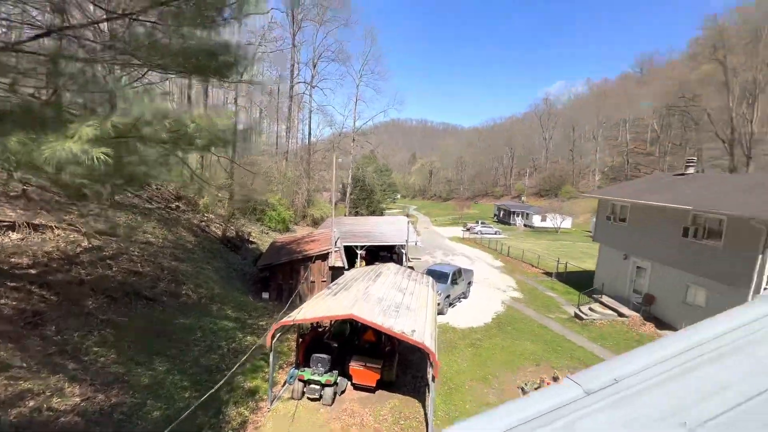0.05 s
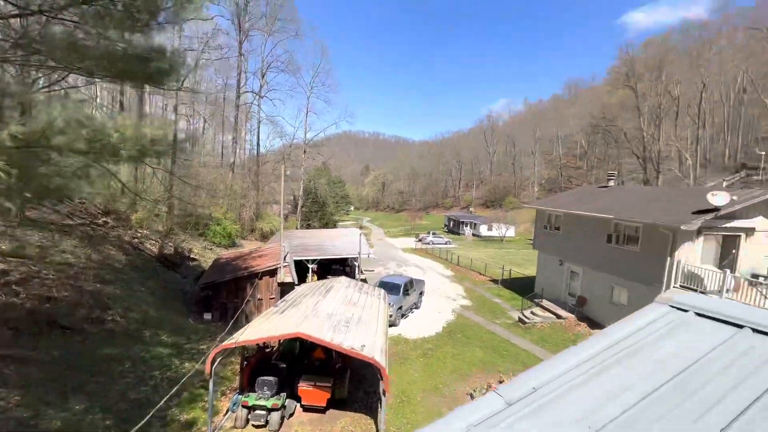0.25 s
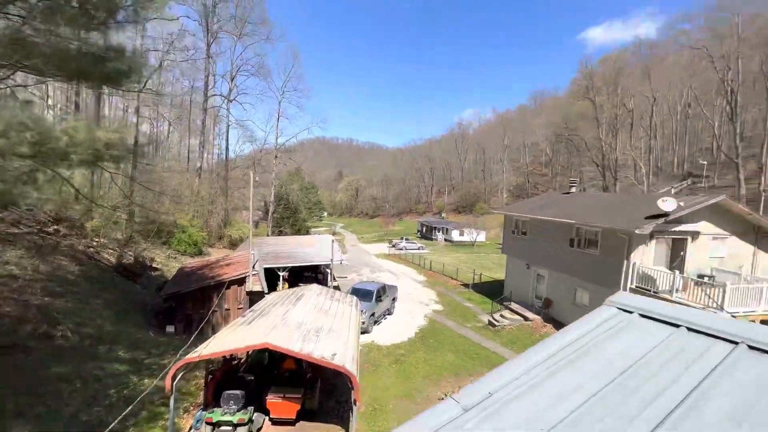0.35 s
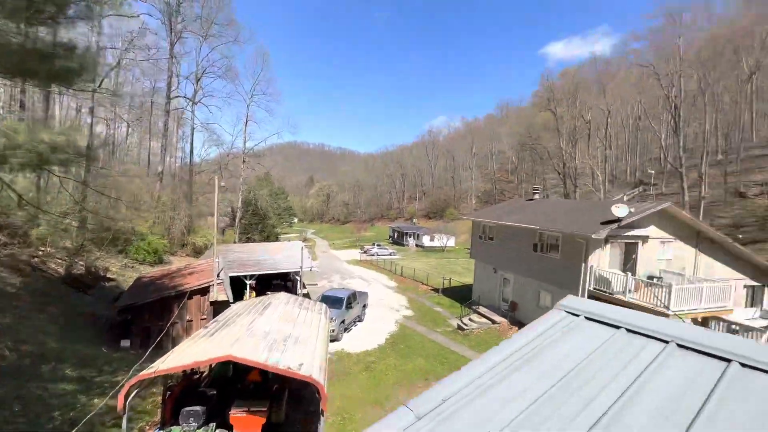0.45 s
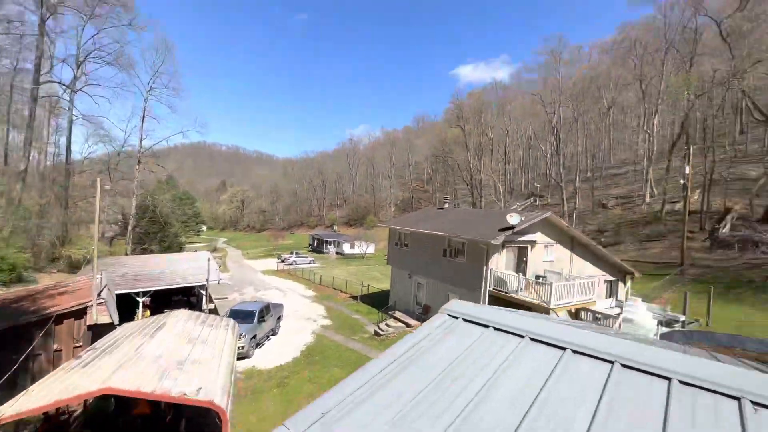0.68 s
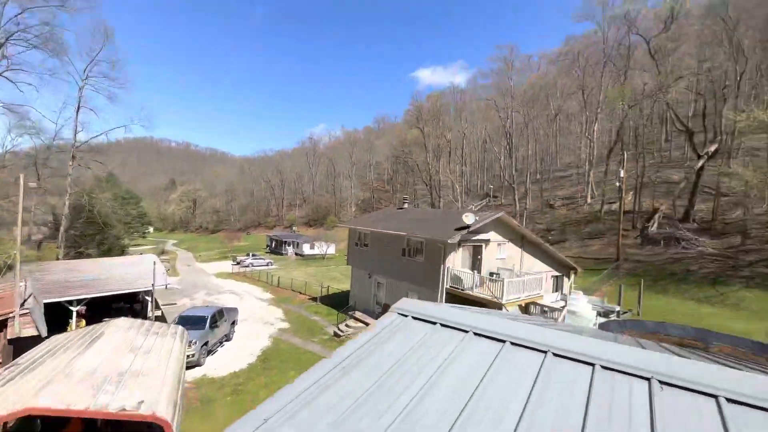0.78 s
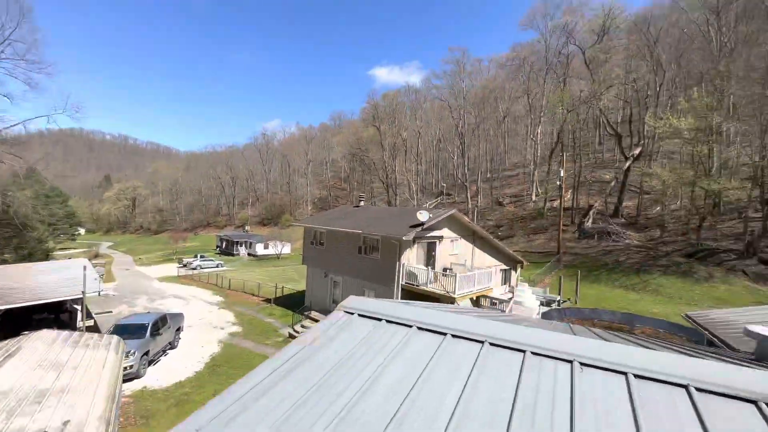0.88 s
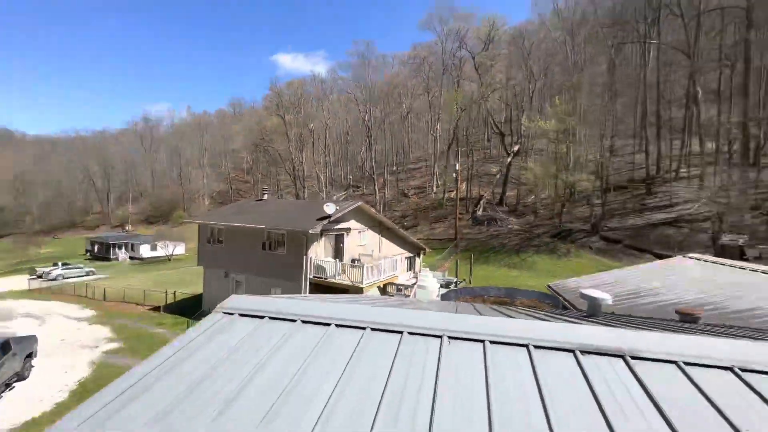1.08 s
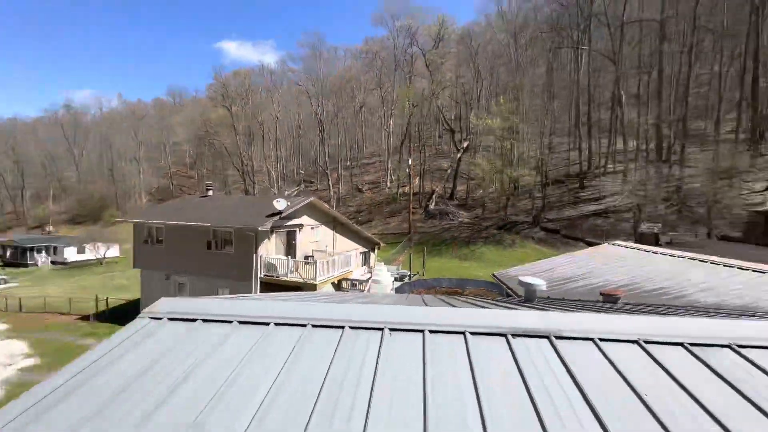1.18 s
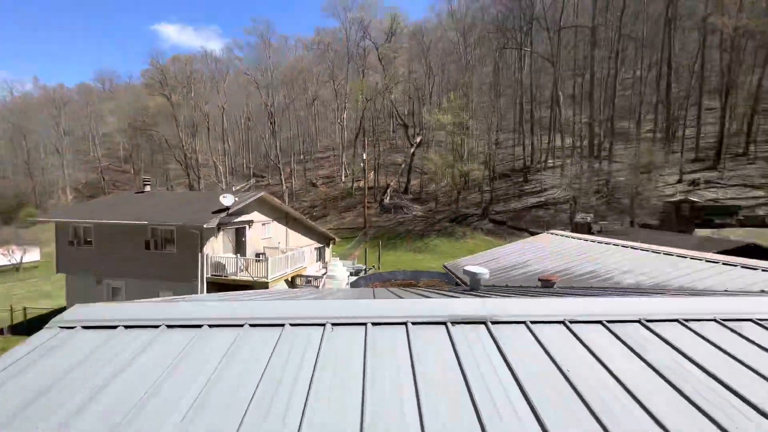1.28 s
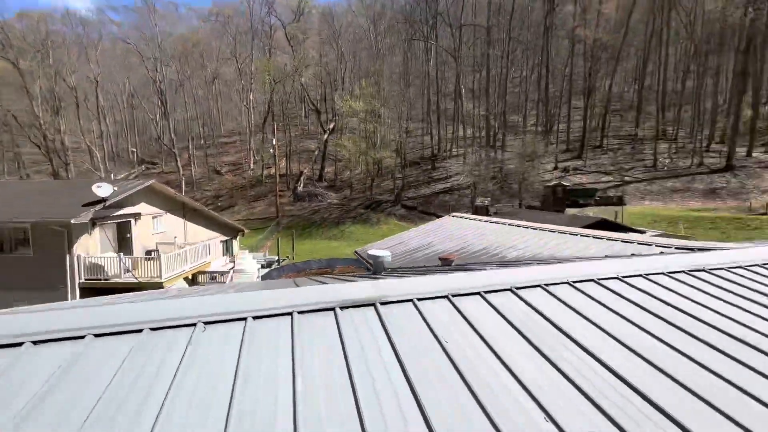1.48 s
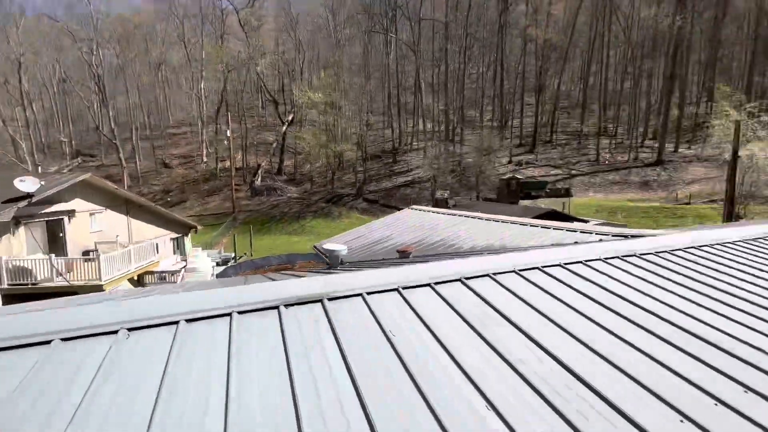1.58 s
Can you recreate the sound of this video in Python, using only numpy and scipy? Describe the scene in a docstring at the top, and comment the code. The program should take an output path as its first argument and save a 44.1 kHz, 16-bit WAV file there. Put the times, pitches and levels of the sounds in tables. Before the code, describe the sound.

Close footsteps sound on a ribbed metal roof. At about 0.25 seconds a step knocks hollowly, and the sheet snaps back with a sharp clack just after 0.3. Soles scuff and tap lightly, with tiny grit clicks, until about 0.8. A second, duller step thumps at 1.35 seconds, followed by a softer bump and a scuff. Faint wind and a distant engine drone continue throughout.

```python
"""Light wind and a far engine's drone fill a quiet valley, and close to a stereo pair of microphones
someone shifts their footing on a ribbed metal roof. A first step knocks on the sheet, which flexes,
rings hollow and snaps back with a sharp clack. Soles scuff and tap, grit clicks, then a second,
duller step thumps. The blows travel through the metal as bending waves, treble ahead of bass."""
import sys
import numpy as np
from scipy import signal
from scipy.fft import rfft, irfft
from scipy.io import wavfile

SR = 44100
rng = np.random.default_rng(int(sys.argv[2]) if len(sys.argv) > 2 else 0)


def output_pcm(signal):
    """Save a mono or channel-first signal as 16-bit PCM at the path in sys.argv[1].

    Samples are clipped to [-1, 1] before scaling.
    """
    pcm = np.clip(np.atleast_2d(signal).T, -1, 1) * 32767
    wavfile.write(sys.argv[1], SR, np.round(pcm).astype(np.int16))


N = 72765
TIME, FREQS = np.arange(N) / SR, np.fft.rfftfreq(N, 1 / SR)
BEND_DELAY_S = 0.001733  # travel time of a 1 kHz bending wave from foot to microphone

# The sheet under a foot. Each row: mode in Hz, level in dB, seconds to fall 60 dB.
PANEL_MODES = [(183.5, -26.5, 0.4), (313, -11.5, 0.014), (450, -1, 0.015), (636, -7.5, 0.014),
               (789, -27, 0.08), (923, -24, 0.073), (1150, -26, 0.03), (1364, -3.5, 0.0068)]
# Rubber sole on painted metal. Each row: frequency in Hz, relative spectral level in dB.
SOLE_SPECTRUM = [(100, 4.5), (300, 0.5), (520, 5), (950, 1.5), (1500, -4.5), (2500, -5.5), (5000, -14),
                 (9000, -18.5), (12000, -31), (16000, -52)]
# Fine hiss of air and cloth. Each row: frequency in Hz, relative spectral level in dB.
HISS_SPECTRUM = [(100, 20.5), (1000, -7), (3000, -2), (6000, -1.5), (9300, -6), (11500, -18.5),
                 (16000, -34)]


def from_db(db):
    """Decibels to gain."""
    return 10 ** (np.asarray(db) / 20)


def rms_one(x):
    """Scale to rms 1."""
    return x / np.sqrt(np.mean(x ** 2) + 1e-20)


def pan(db):
    """Stereo gains for a pan in dB, left minus right."""
    return from_db(np.array([[db], [-db]]) / 2)


def level_curve(rows):
    """Gain over time through points of seconds and dB."""
    return from_db(np.interp(TIME, *np.transpose(rows)))


def swells(rows):
    """Gain over time of bell-shaped bumps."""
    return sum(from_db(db) * np.exp(-.5 * ((TIME - s) / half_s) ** 2) for s, half_s, db in rows)


def across_freqs(points):
    """Spread a table over FREQS on a log-frequency axis."""
    hz, value = np.transpose(points)
    return np.interp(np.log(FREQS + 1e-9), np.log(hz), value)


def butter(x, hz, kind, order=2):
    """Causal low- or high-pass."""
    return signal.sosfilt(signal.butter(order, hz, kind, fs=SR, output="sos"), x + 1e-18)


def drift(rate_hz):
    """Random motion of rms 1, mostly slower than rate_hz."""
    return rms_one(irfft(rfft(rng.standard_normal(N)) / (1 + (FREQS / rate_hz) ** 2), N))


def noise(spectrum):
    """Coloured stereo noise of rms 1, alike in the bass and wide in the treble."""
    # Likeness at the two microphones. Each row: frequency in Hz, left-right correlation.
    correlation = [(60, 0.59), (200, 0.76), (500, 0.14), (1200, 0.12), (3000, 0.096), (9000, 0.052)]
    alike = across_freqs(correlation)
    mid, side = rfft(rng.standard_normal((2, N))) * from_db(across_freqs(spectrum)) * (FREQS > 20)
    return rms_one(irfft(np.sqrt(1 + alike) * mid + np.sqrt(1 - alike) * side * [[1], [-1]], N))


def decay(start, t60, attack=0.0018):
    """Quick rise, then a fall of 60 dB every t60 seconds."""
    age = np.maximum(TIME - start, 0)
    return (1 - np.exp(-age / attack)) * np.exp(-np.log(1000) * age / t60)


def strike(start, modes):
    """Damped modes set ringing at one moment."""
    age = np.maximum(TIME - start, 0)
    return sum(from_db(db) * np.sin(2 * np.pi * hz * age) * np.exp(-np.log(1000) * age / t60)
               for hz, db, t60 in modes)


def bend(x, delay_s):
    """Bending waves run faster at high pitch, so a blow arrives as a short falling chirp."""
    return irfft(rfft(x) * np.exp(-4j * np.pi * delay_s * np.sqrt(1000 * FREQS)), N)


def wind():
    """Wind eases off in the valley's trees, with a fine fluttering hiss above it."""
    # The low wash. Each row: frequency in Hz, relative spectral level in dB.
    wash_spectrum = [(25, -17), (50, 10.5), (120, -2.5), (230, -2), (550, 0.5), (950, -4.5), (1550, -6),
                     (2800, -12), (6000, -23), (14000, -39)]
    # Rise and fall of the wash and of the hiss. Each row: time in seconds, level in dB.
    wash_levels = [(0, -51), (.22, -53), (.42, -53), (.6, -54), (.85, -58.5), (1.15, -61), (1.26, -62.5),
                   (1.31, -60), (1.52, -58), (1.65, -68)]
    hiss_levels = [(0, -56.5), (.4, -63.5), (.72, -61), (.95, -62.5), (1.17, -63.5), (1.25, -61),
                   (1.31, -68.5), (1.4, -67.5), (1.5, -62), (1.65, -66)]
    flutter = from_db(2.34 * drift(rate_hz=14))
    hiss = level_curve(hiss_levels) * flutter * noise(HISS_SPECTRUM)
    wash = level_curve(wash_levels) * noise(wash_spectrum)
    return wash * pan(1.5) + hiss * pan(0.44)


def far_engine():
    """A distant engine's low tones waver and slowly fade while a higher whine comes and goes."""
    # The drone. Each row: frequency in Hz, level in dB halfway through the scene.
    drone_tones = [(55, -57), (97, -61.5), (135.5, -73), (194, -73.5), (388, -88)]
    # The whine. Each row: time in seconds, level in dB.
    whine_levels = [(0, -67.5), (.55, -60.5), (.8, -83), (.98, -72), (1.12, -66), (1.3, -69), (1.65, -72)]
    waver_db, fade_db_per_s, whine_hz = 0.25, 3.5, 293.7

    def tone(hz):
        return np.sqrt(2) * np.sin(2 * np.pi * hz * TIME + 0.52 * drift(rate_hz=3.5))
    drone = sum(from_db(db + waver_db * drift(rate_hz=7)) * tone(hz) for hz, db in drone_tones)
    fade = from_db(-fade_db_per_s * (TIME - TIME.mean()))
    whine = level_curve(whine_levels) * tone(whine_hz)
    return (drone * fade + whine) * pan(.9)


def sheet_ring():
    """Off to the left, the whole sheet murmurs under a sliding sole and sings after a hard blow."""
    # Its thin metallic ring. Each row: mode in Hz, level in dB.
    modes = [(428, -14.5), (628, -10), (749, -7.5), (1320, 0.5), (1460, -1.5), (1520, -3), (1640, 0),
             (1760, -6.5), (2250, -5.5), (2955, -7.5), (3491, -10.5)]
    # The sole sliding. Each row: time in seconds, level in dB.
    rub_levels = [(0, -53), (.2, -55.5), (.45, -60.5), (.65, -75), (.9, -76), (1.65, -69.5)]
    # Hard blows. Each row: start in seconds, level in dB.
    blows = [(0.272, -47.5), (.3245, -34.5)]
    width_hz, ring_t60 = 51, 0.097
    resonance = sum(from_db(db) / (1 + 2j * (FREQS - hz) / width_hz) for hz, db in modes)
    rubbed = level_curve(rub_levels) * rms_one(irfft(rfft(noise(SOLE_SPECTRUM)) * resonance, N))
    damped_modes = [(hz, db, ring_t60) for hz, db in modes]
    struck = sum(from_db(db) * strike(s, damped_modes) for s, db in blows)
    return (rubbed + struck) * pan(5.9)


def cloth():
    """Clothing rustles, soft and bright, with the movement."""
    # Each row: middle in seconds, half length in seconds, level in dB.
    rustles = [(.228, 0.014, -62), (.292, 0.0078, -52), (1.225, 0.04, -67.5), (1.615, 0.019, -60.5)]
    return swells(rustles) * rms_one(butter(noise(HISS_SPECTRUM), 3460, "high"))


def footfalls():
    """Rubber slaps the paint, the panel rings and the blow spreads through the roof, the bass longest."""
    # Contacts, dull when soft and thin when light. Each row: start in seconds, level in dB, low-pass
    # in Hz, high-pass in Hz, tail trim in dB, pan in dB, bearing to the right in degrees.
    contacts = [(0.2455, -25, 1940, 372, -3.5, -3.5, -11), (.2720, -14.5, 1600, 268, -7.5, 0, 19),
                (0.2811, -26.5, 1290, 200, 5.5, 5, 31), (0.4678, -29, 2600, 405, -9, 1, -11),
                (1.3418, -17.5, 730, 246, -3.5, -2.5, 34.5), (1.3512, -29, 504, 188, 5, 1, 14),
                (1.436, -32.5, 750, 240, 4.5, 2, 5), (1.4451, -30.5, 376, 160, -3.5, -1, -8),
                (1.475, -40, 870, 300, -9, 4, -7)]
    mic_gap_s = .00045  # travel time of sound between the microphones
    roof = 0
    for s, db, bright_hz, low_hz, tail_db, pan_db, bearing in contacts:
        left_lag, arrival = mic_gap_s * np.sin(np.radians(bearing)), s + BEND_DELAY_S
        panel = np.array([strike(s + left_lag, PANEL_MODES), strike(s, PANEL_MODES)])
        knock = bend(panel, BEND_DELAY_S) * pan(pan_db) + from_db(tail_db - 10) * roof_tail(arrival)
        body = butter(butter(knock, bright_hz, "low"), low_hz, "high")
        slap = from_db(-31.5) * butter(noise(SOLE_SPECTRUM), 1610, "high") * decay(arrival, t60=0.1)
        roof = roof + from_db(db) * (body + slap)
    return roof


def roof_tail(start):
    """A blow scatters through the roof as a short wash whose bass lingers."""
    # Each row: frequency in Hz, relative spectral level in dB.
    spectrum = [(50, 1), (170, 2), (280, 5.5), (450, 5), (750, 4), (1050, -4.5), (1450, 1.5), (2200, -5),
                (6000, -11.5), (14000, -23)]
    wash = noise(spectrum)
    return wash * decay(start, t60=0.13) + butter(wash, 277, "low") * decay(start, t60=0.23)


def deck_flex():
    """The roof deck gives under the weight and swings a few times."""
    # Each row: start in seconds, level in dB.
    loads = [(0.2553, -19.5), (0.322, -29), (1.441, -42)]
    swing_hz = 71
    return sum(from_db(db) * np.cos(2 * np.pi * swing_hz * (TIME - s)) * decay(s, 0.076, attack=0.0048)
               for s, db in loads)


def span_booms():
    """A hollow ring lingers in the span under the foot; a shorter span rings higher."""
    # Heavy blows. Each row: start in seconds, level in dB, pitch ratio, high-pass in Hz.
    blows = [(.276, -36, 0.99, 111), (1.349, -39, 1.18, 150), (1.443, -49, 1.27, 210)]
    # The span. Each row: mode in Hz at pitch ratio 1, level in dB, seconds to fall 60 dB.
    modes = [(125.5, -5, 0.2), (161.3, -4.5, .3), (279.7, -6.5, .2), (402.6, -4, 0.11), (484, -7, 0.15),
             (586, -16, 0.13), (716, -3.5, 0.12), (778, -1, 0.061), (883, -12, 0.16)]
    booms = 0
    for s, db, pitch, low_hz in blows:
        span = strike(s, [(hz * pitch, level, t60) for hz, level, t60 in modes])
        booms = booms + from_db(db) * butter(span, low_hz, "high")
    return bend(butter(booms, 1080, "low"), BEND_DELAY_S)


def scuffs():
    """Rubber drags over the paint in swells of fine grains."""
    # Each row: middle in seconds, half length in seconds, level in dB.
    drags = [(0.293, 0.037, -42.5), (0.361, 0.037, -48), (0.452, 0.023, -46), (0.536, 0.012, -52),
             (0.608, 0.019, -60), (1.628, 0.058, -54)]
    friction = noise(SOLE_SPECTRUM) * np.exp(0.27 * drift(rate_hz=160))
    return swells(drags) * rms_one(friction) * pan(1.2)


def sheet_snap():
    """The sheet pops back: a hard clack, its reflection from a seam, a dull jolt and a metallic wash."""
    # The clack. Each row: mode in Hz, level in dB, seconds to fall 60 dB.
    modes = [(1346, -7, 0.036), (1478, -8, 0.03), (1750, -24.5, 0.015), (2256, 2.5, 0.0075),
             (3000, -3.5, 0.014), (3150, -21.5, 0.017), (4470, -11, 0.0087), (8940, -18, 0.0087)]
    # The wash. Each row: frequency in Hz, relative spectral level in dB.
    wash_spectrum = [(100, -3), (220, -11), (450, -0.5), (1100, -10), (1430, 7.5), (1900, -4.5),
                     (2300, -3.5), (2650, 1.5), (3050, -6), (4000, -8.5), (5100, -11.5), (9000, -18),
                     (14000, -44)]
    start, seam_echo_s = .324, 0.012
    clack = strike(start, modes) + from_db(-18) * strike(start + seam_echo_s, modes)
    clack = from_db(-14.5) * pan(4.5) * butter(clack, 1230, "high", order=3)
    jolt = from_db(-30) * pan(-2) * strike(start, PANEL_MODES)
    wash = from_db(-20) * pan(-0.5) * noise(wash_spectrum) * decay(start, t60=0.07, attack=0.0039)
    return bend(clack + jolt, delay_s=0.00071) + wash


def grit():
    """Grains under the sole give tiny bright clicks, each with a brief crisp crunch."""
    # Each row: start in seconds, level in dB, pan in dB.
    clicks = [(0.3889, -29, 2.5), (0.533, -47, -5), (1.345, -56, -8), (1.429, -55, 1), (1.622, -43, 10)]
    # One grain. Each row: mode in Hz, level in dB, seconds to fall 60 dB.
    modes = [(3200, -16, 0.0041), (6400, -3, 0.0043), (7930, -3, 0.0043), (14100, -18, 0.0072)]
    crunch = from_db(-10) * butter(rng.standard_normal((2, N)), 4700, "high")
    crunch = butter(crunch, 11000, "low", order=1)
    return sum(from_db(db) * pan(pan_db) * (strike(s, modes) + crunch * decay(s, 0.025, attack=.0004))
               for s, db, pan_db in clicks)


def sole_taps():
    """Light touches of the sole reach only the sheet's upper modes."""
    # Each row: start in seconds, level in dB, pan in dB, high-pass in Hz.
    touches = [(0.454, -43, 6, 296), (0.534, -50.5, -2, 302), (0.541, -46, -9, 400), (0.6, -44.5, 2, 900),
               (0.6234, -46.5, 3, 500), (0.704, -50, -2, 300), (0.761, -46.5, 0, 400),
               (0.83, -43.5, 5.5, 2640), (1.095, -56, -3, 400)]
    # The lightly tapped sheet. Each row: mode in Hz, level in dB, seconds to fall 60 dB.
    modes = [(523, -25, 0.0099), (824, -2, 0.036), (1206, -2, 0.017), (1520, -8.5, 0.012),
             (2290, -10.5, 0.014), (3070, -10.5, 0.014)]
    wash = from_db(-4.5) * noise(SOLE_SPECTRUM)
    taps = 0
    for s, db, pan_db, low_hz in touches:
        tap = strike(s, modes) + wash * decay(s, t60=0.035)
        taps = taps + from_db(db) * pan(pan_db) * butter(tap, low_hz, "high")
    return taps


def scene():
    """Feet on the roof close by, the valley behind."""
    return (wind() + far_engine() + sheet_ring() + cloth() + footfalls() + deck_flex() + span_booms()
            + scuffs() + sheet_snap() + grit() + sole_taps())


def mic_port(x, resonances):
    """A microphone's port puts peaks and dips in the treble."""
    for hz, db, q in resonances:
        gain, angle = from_db(db / 2), 2 * np.pi * hz / SR
        width = np.sin(angle) / (2 * q)
        numerator = [1 + width * gain, -2 * np.cos(angle), 1 - width * gain]
        denominator = [1 + width / gain, -2 * np.cos(angle), 1 - width / gain]
        x = signal.lfilter(numerator, denominator, x)
    return x


def record(dry):
    """Each microphone of the pair has its own colour; rumble and the very top are cut."""
    # Port resonances, left list then right. Each row: frequency in Hz, gain in dB, Q.
    ports = [
        [(5500, 3.5, 1.07), (11350, -16.5, 3.7)],
        [(5550, -9, 1.23), (8860, 8, 2.8), (12500, -6, 3.9)],
    ]
    rumble_hz, top_hz = 35, 15700
    coloured = np.array([mic_port(channel, port) for channel, port in zip(dry, ports)])
    coloured = butter(coloured, rumble_hz, "high", order=4)
    return signal.sosfilt(signal.ellip(10, .2, 80, top_hz, fs=SR, output="sos"), coloured)


dry = scene()
out = record(dry)
output_pcm(out)
```